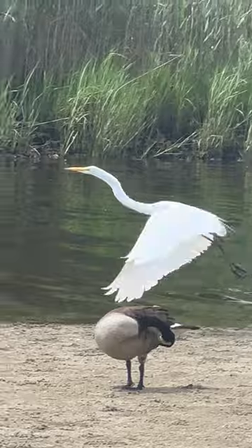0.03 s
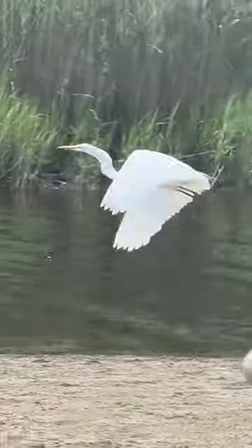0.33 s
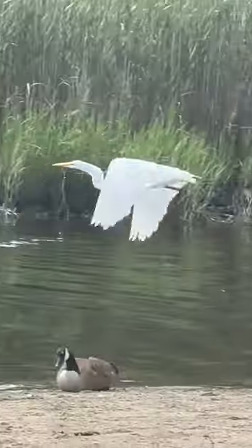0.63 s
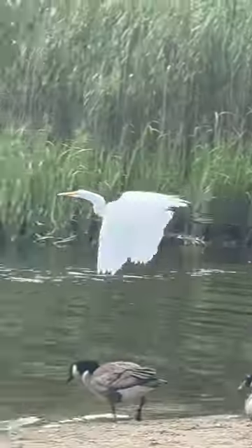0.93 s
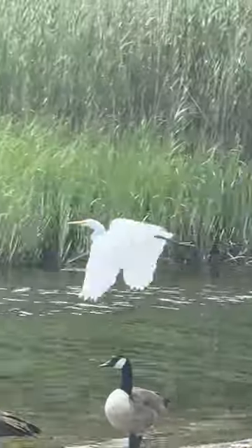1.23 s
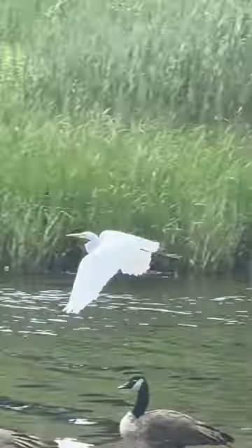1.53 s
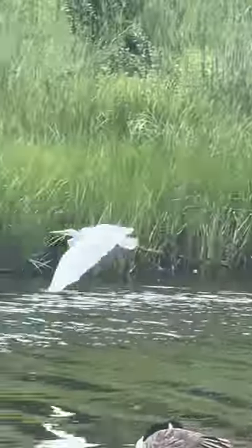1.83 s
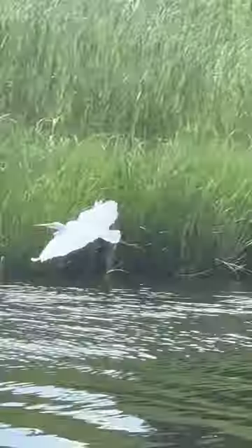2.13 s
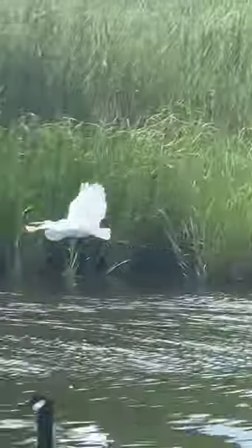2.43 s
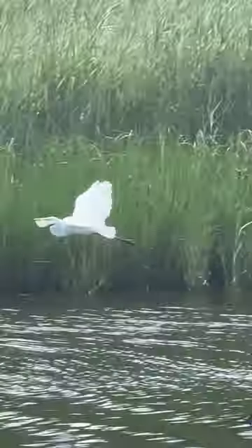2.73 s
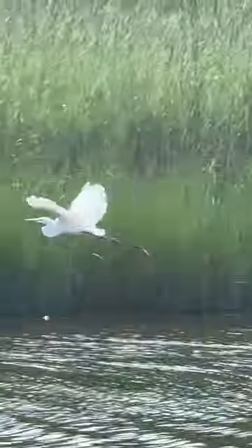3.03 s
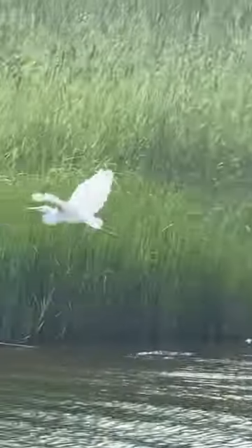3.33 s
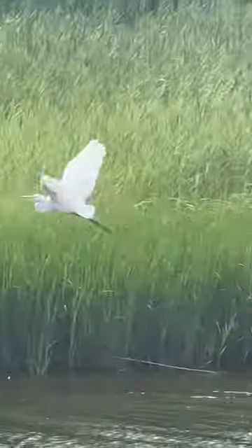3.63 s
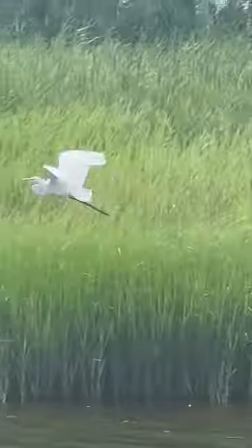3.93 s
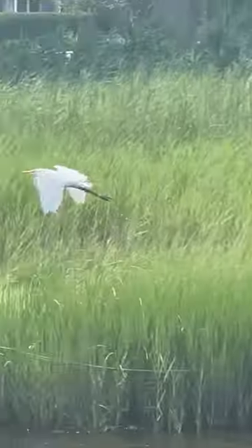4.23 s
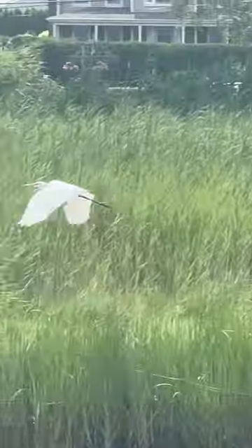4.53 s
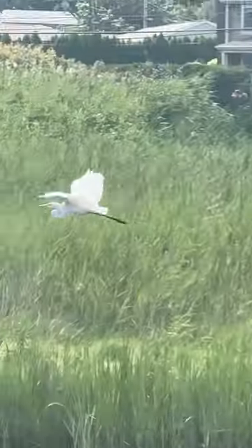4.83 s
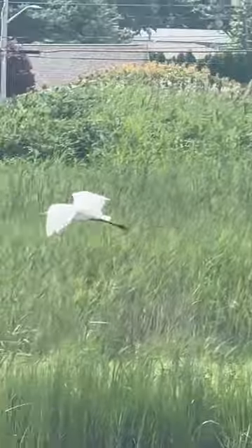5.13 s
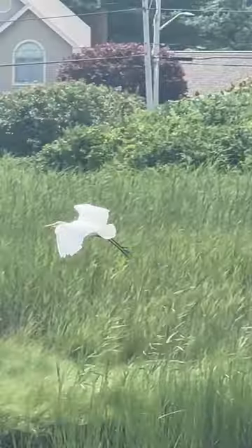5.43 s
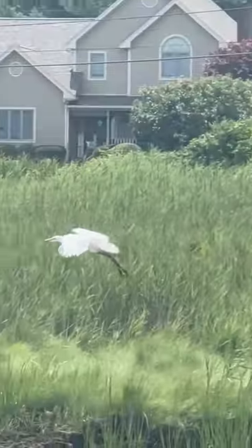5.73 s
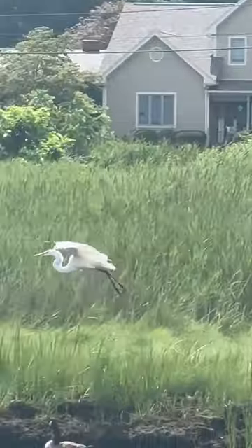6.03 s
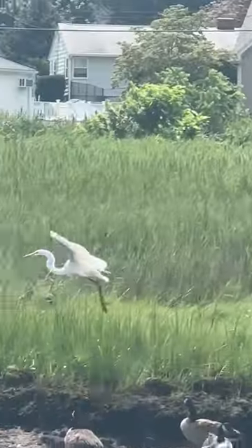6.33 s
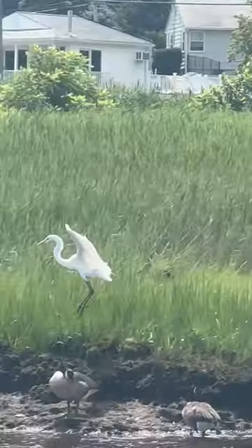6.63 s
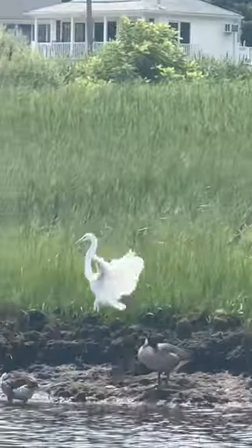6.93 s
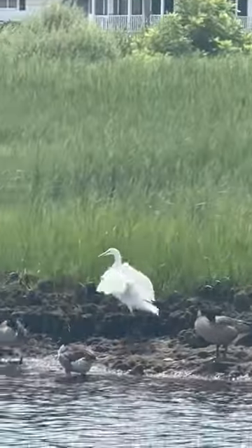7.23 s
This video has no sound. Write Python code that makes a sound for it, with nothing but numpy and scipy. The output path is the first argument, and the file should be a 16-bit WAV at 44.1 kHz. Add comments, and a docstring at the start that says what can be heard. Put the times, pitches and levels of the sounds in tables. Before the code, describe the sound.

Gusts of wind rumble and thump on the microphone outdoors, then ease to a breeze over faint distant traffic.

```python
"""Edge of a tidal marsh: gusts of wind buffet a hand-held microphone.
Large eddies rumble on its two ports, small ones flutter when the gust is strong, and single eddies
hit as thumps and pops. Behind the wind lie a far wash of traffic with a faint whine, thin hiss,
distant birds and a few ticks and bumps of the hand on the case."""
import sys
import numpy as np
from scipy import signal
from scipy.fft import rfft, irfft
from scipy.io import wavfile

SR = 44100
rng = np.random.default_rng(int(sys.argv[2]) if len(sys.argv) > 2 else 0)


def waveform_to_disk(signal):
    """Save audio, clipped to [-1, 1], as 16-bit WAV at the path in sys.argv[1]."""
    frames = np.transpose(np.atleast_2d(signal))
    scaled = np.clip(frames, -1, 1) * 32767
    samples = np.round(scaled).astype(np.int16)
    wavfile.write(sys.argv[1], SR, samples)


N = 325458
T = np.arange(N) / SR
HZ = np.fft.rfftfreq(N, 1 / SR) + 1e-3

# Breeze, two long gusts, one short: (time [s], large-eddy level [dB], middle-eddy level [dB])
WIND_LEVELS = [(0.0, -43.5, -49.5), (0.2, -39, -42), (0.28, -41.5, -51.5), (0.95, -42.5, -49),
               (1.22, -38.5, -40.5), (1.62, -33.5, -41.5), (2.0, -37.5, -44), (2.33, -39.5, -43.5),
               (2.45, -29.5, -28.5), (2.8, -27.5, -20.5), (3.05, -28.5, -22), (3.35, -26.5, -25),
               (3.85, -33.5, -35), (4.24, -30.5, -27), (4.31, -19.5, -20), (4.55, -17.5, -18),
               (4.98, -15.5, -20), (5.14, -20.5, -29.5), (5.54, -25.5, -29), (5.65, -40, -41.5),
               (5.84, -30.5, -35), (6.02, -28, -28), (6.12, -31, -40.5), (6.35, -44, -48.5),
               (7.38, -44.5, -52)]


def wind(low_hz=140, high_hz=450, churn_hz=50, puff_db=1.97, steady_db=-20):
    """Eddies of three sizes, churned by the same turbulence; lulls still the smallest most."""
    # Eddy spectrum: (frequency [Hz], relative level [dB])
    spectrum = [(20, -20), (40, 2.5), (70, 6.5), (160, 0.5), (250, -1), (385, -10), (597, -10),
                (1080, -26.5), (1400, -46), (1900, -79), (3000, -77.5), (6000, -125)]
    large_db, middle_db = curves(WIND_LEVELS)
    small_db = middle_db - 11.5 + 0.41 * (middle_db - large_db)
    fitful = np.clip((steady_db - middle_db) / 20, 0, 1)  # a breeze puffs, a full gust blows evenly
    puffs = noise(below(HZ, 12, order=4) * below(5.6, HZ, order=4))
    drop_db = lull_db() + puff_db * fitful * puffs
    colour = spectrum_gain(spectrum)
    under_low, under_high = below(HZ, low_hz, order=5), below(HZ, high_hz, order=5)
    churn = np.clip(noise(below(HZ, churn_hz, order=2)), -2.5, 2.5)

    def eddies(band, churn_db):
        return steadied(port_noise(colour * band) * gain_of(churn_db * churn), window_s=0.12)

    rumble = eddies(under_low, churn_db=1)
    body = eddies(np.sqrt(1 - under_low ** 2) * under_high, churn_db=3)
    flutter = eddies(np.sqrt(1 - under_high ** 2), churn_db=3.5)
    return (gain_of(large_db - 0.5 - 0.96 * drop_db) * rumble
            + gain_of(middle_db - 0.5 - drop_db) * body
            + gain_of(small_db - 1.5 * drop_db) * flutter)


def lull_db():
    """Drop in wind level as the flow briefly lets go of the ports."""
    # Lulls, negative for a surge: (time [s], half length [s], depth [dB])
    lulls = [(0.87, 0.081, 4.5), (1.404, 0.016, 2.5), (2.33, 0.015, -1), (2.395, 0.014, -2.5),
             (2.459, 0.011, 9), (2.52, 0.0064, 3), (2.593, 0.016, 6.5), (2.645, 0.05, 4),
             (2.863, 0.013, 6.5), (3.017, 0.0048, 1.5), (3.146, 0.0058, 5.5), (3.186, 0.0041, 8),
             (3.236, 0.035, 8.5), (3.282, 0.012, 1), (3.392, 0.0087, 12), (3.431, 0.01, 5.5),
             (3.481, 0.02, 11), (3.682, 0.022, 7.5), (3.887, 0.0062, 15), (4.049, 0.013, 9.5),
             (4.156, 0.026, 9.5), (4.392, 0.01, 4.5), (4.636, 0.022, 5.5), (4.745, 0.035, 8),
             (4.871, 0.044, 5.5), (4.96, 0.008, -2), (5.064, 0.029, 13.5), (5.203, 0.021, 11.5),
             (5.253, 0.015, 7), (5.311, 0.0099, 4), (5.454, 0.017, 1.5), (5.745, 0.03, 1.5),
             (5.947, 0.022, 6.5)]
    return sum(depth_db * swell(s, half_s) for s, half_s, depth_db in lulls)


def buffets(cycles=2.09, top_hz=1550, push_share=0.48, size=4096):
    """Single eddies: one push in a few cycles of churning; the smaller, the shorter and brighter."""
    # Strongest eddies on the ports: (time [s], level [dB], corner [Hz])
    hits = [(0.724, -27.5, 323), (1.161, -32, 330), (1.238, -24, 300), (1.291, -34, 328), (1.484, -26, 270),
            (1.611, -20.5, 168), (1.653, -28.5, 260), (1.781, -27, 129), (2.06, -26.5, 302),
            (2.202, -30.5, 290), (2.343, -23.5, 380), (2.36, -12, 530), (2.372, -18, 420), (2.42, -10, 450),
            (2.429, -17.5, 560), (2.475, -19, 720), (2.494, -9.5, 476), (2.527, -18, 450),
            (2.534, -14, 560), (2.553, -13.5, 430), (2.563, -13, 480), (2.572, -19.5, 700),
            (2.604, -22, 600), (2.626, -17.5, 450), (2.652, -16, 450), (2.719, -15, 380), (2.745, -11, 423),
            (2.786, -11, 480), (2.818, -12.5, 310), (2.83, -12, 370), (2.846, -10, 420), (2.881, -10, 394),
            (2.922, -9, 380), (2.964, -2, 324), (3.001, -7, 310), (3.024, -15, 616), (3.031, -7.5, 230),
            (3.104, -15, 380), (3.131, -14, 520), (3.159, -12.5, 580), (3.194, -12, 412), (3.204, -7, 241),
            (3.263, -16.5, 560), (3.276, -21, 620), (3.309, -4.5, 310), (3.324, -12, 397),
            (3.342, -12.5, 345), (3.375, -11.5, 490), (3.409, -20, 473), (3.431, -20, 460),
            (3.452, -13.5, 460), (3.474, -23, 700), (3.517, -10.5, 470), (3.566, -16, 506),
            (3.577, -17.5, 380), (3.588, -21.5, 694), (3.604, -18, 300), (3.65, -30, 370),
            (3.727, -13, 470), (3.771, -12.5, 383), (3.802, -22, 850), (3.861, -21, 940),
            (3.937, -16.5, 745), (3.964, -20, 870), (4.005, -7.5, 303), (4.014, -19.5, 795),
            (4.077, -15.5, 440), (4.091, -23, 796), (4.102, -12.5, 510), (4.108, -10, 240),
            (4.2, -18.5, 600), (4.302, -3, 237), (4.314, -12, 380), (4.324, -5.5, 220), (4.369, -19, 300),
            (4.409, -13, 520), (4.416, -8, 226), (4.429, -11.5, 600), (4.483, -9, 252), (4.519, -14, 330),
            (4.557, -3, 260), (4.562, -8, 545), (4.59, -7.5, 300), (4.65, -6, 278), (4.696, -20.5, 810),
            (4.708, -15, 228), (4.795, -16, 520), (4.804, -2, 229), (4.934, -3.5, 360), (4.982, -8.5, 330),
            (4.994, -16, 540), (5.011, -6.5, 230), (5.095, -15, 400), (5.117, -14.5, 165),
            (5.164, -10.5, 310), (5.214, -10.5, 300), (5.236, -15, 273), (5.283, -11.5, 363),
            (5.324, -13.5, 171), (5.367, -14.5, 490), (5.385, -15, 170), (5.415, -10, 307),
            (5.494, -11.5, 330), (5.527, -19, 330), (5.67, -22.5, 418), (5.7, -19.5, 300),
            (5.839, -19, 440), (5.864, -24, 560), (5.893, -21, 430), (6.007, -12.5, 404), (6.05, -25, 487),
            (6.079, -25, 620), (6.086, -20, 250), (6.941, -25, 306)]
    out = np.zeros((2, N))
    t, hz = event_axes(size)
    for s, db, corner_hz in hits:
        colour = below(hz, 1.046 * corner_hz, order=3.54) * below(0.27 * corner_hz, hz, order=2)
        colour *= below(hz, top_hz, order=6)
        churn = port_noise(colour, size) * np.exp(-(t * corner_hz / cycles) ** 2)
        churn /= abs(churn).max(1, keepdims=True)
        phase = 2 * np.pi * rng.random((2, 1))
        push = np.fft.fftshift(irfft(colour * np.exp(1j * phase)), axes=1)
        push /= abs(push).max()
        add(out, s, gain_of(db) * (push_share * push + (1 - push_share) * churn))
    return out


def pops(low_hz=300, top_hz=4200, size=4096):
    """A small eddy bursts right on the port: one spike of suction, equal in both channels."""
    # Bursts: (time [s], peak [dB], brightness [Hz])
    bursts = [(3.193, -12.5, 343), (3.226, -21, 520), (4.199, -18.5, 470), (4.277, -20, 500),
              (4.299, -21, 400), (4.351, -21, 400), (4.436, -17.5, 500), (4.456, -22, 450),
              (4.4876, -12.5, 1000), (4.514, -20, 430), (4.554, -17, 500), (4.612, -17.5, 580),
              (4.672, -24, 400), (4.712, -16, 460), (4.794, -15.5, 400)]
    out = np.zeros((2, N))
    _, hz = event_axes(size)
    for s, peak_db, bright_hz in bursts:
        colour = np.exp(-hz / bright_hz) * below(low_hz, hz, order=2) * below(hz, top_hz, order=8)
        spike = np.fft.fftshift(irfft(colour))
        add(out, s, -gain_of(peak_db) * spike / spike.max())
    return out


def spits(per_s=18, over_wind_db=-4, scatter_db=4.5, corner_hz=700, low_hz=220, top_hz=1500):
    """Tiny eddies pop at random, scaled by the wind that carries them."""
    _, middle_db = curves(WIND_LEVELS)
    scatter = np.clip(rng.standard_normal(N), -2, 2)
    peak_db = middle_db - lull_db() + over_wind_db + scatter_db * scatter
    impulses = (rng.random(N) < per_s / SR) * gain_of(peak_db) * rng.choice([-1, 1], (2, N))
    colour = below(HZ, corner_hz, order=3) * below(low_hz, HZ, order=2) * below(HZ, top_hz, order=6)
    return irfft(rfft(impulses) * colour, N) / irfft(colour, N).max()


def spread(mid_side, hollow, lull_widening=0.58, dip_octaves=0.36):
    """Mid/side to left/right: central bass, one wide band, wider in lulls; hollow thins its centre."""
    # Band where the ports differ: (time [s], base side/mid at 1 kHz [dB], low edge [Hz], high edge [Hz])
    wide_band = [(0, -3.5, 905, 1500), (1.0, 0.5, 830, 1370), (1.7, 4, 590, 1080), (2.28, 1.5, 480, 1120),
                 (2.4, 2, 302, 1030), (2.75, 2.5, 315, 940), (3.15, -0.5, 297, 840), (3.5, -4.5, 293, 830),
                 (3.8, 7.5, 243, 595), (4.3, 6, 153, 590), (4.78, 5.5, 177, 655), (4.9, 6, 210, 1260),
                 (5.15, 6.5, 241, 1060), (5.48, 11, 330, 1300), (5.65, 3.5, 580, 1370),
                 (5.85, -1.5, 710, 1590), (6.1, 0, 845, 1370), (7.38, -5, 844, 1420)]
    # Brief dips of the mid signal: (time [s], half length [s], depth [dB], centre [Hz])
    mid_dips = [(2.45, 0.6, 6, 825), (5.049, 0.042, 29, 695), (5.13, 0.02, 15, 780), (5.197, 0.02, 23, 880),
                (5.234, 0.028, 26, 694), (5.325, 0.021, 10, 950), (5.46, 0.046, 28, 820),
                (5.578, 0.042, 34, 1000), (5.63, 0.041, 34, 880), (5.663, 0.022, 11, 1270),
                (5.774, 0.082, 15, 1130), (5.93, 0.056, 11, 1150)]
    hz, t, (mid, side) = signal.stft(mid_side, SR, nperseg=1024, noverlap=768)
    hz = hz[:, None] + 1
    db, low_hz, high_hz, drop_db = (np.interp(t, T, c) for c in curves(wide_band) + [lull_db()])
    band = below(low_hz, hz, order=6) * below(hz, high_hz, order=11) * below(hz, 1900, order=10)
    side_gain = gain_of(db + lull_widening * drop_db) * (hz / 1000) ** 2.11 * band
    dip_db = sum(depth_db * np.exp(-((t - s) / half_s) ** 4 - (np.log2(hz / dip_hz) / dip_octaves) ** 2)
                 for s, half_s, depth_db, dip_hz in mid_dips)
    spectra = np.array([mid * gain_of(-dip_db), side * side_gain]) / (1 + side_gain ** 2) ** (hollow / 2)
    return left_right(*signal.istft(spectra, SR, nperseg=1024, noverlap=768)[1][:, :N])


def overload(x, ceiling=0.75, rasp_db=-33, low_hz=610, top_hz=1900):
    """Hard blows round off in the microphone; air rasps on the port at each pressure crest."""
    rounded = ceiling * np.tanh(x / ceiling)
    rasp = noise(below(low_hz, HZ, order=3) * below(HZ, top_hz, order=6))
    return rounded + gain_of(rasp_db) * rasp * rounded.mean(0) ** 2


def ticks(low_hz=1350, top_hz=9400, ring_hz=7700, dip_hz=5900, width_hz=800, size=4096):
    """Dry snaps and scuffs on the case, which adds one high ring above a dip."""
    # Handling contacts: (time [s], level [dB], half length [s], centre [Hz], snap share [0-1])
    contacts = [(0.2177, -31, 0.0007, 2700, 0.9), (0.2232, -21, 0.0012, 2750, 0.6),
                (0.231, -42, 0.015, 2200, 0), (0.345, -43, 0.014, 4430, 0.1),
                (1.867, -40, 0.0052, 2600, 0.17), (3.296, -45, 0.011, 3000, 0.05),
                (6.826, -46, 0.009, 1850, 0), (7.026, -49, 0.004, 4370, 0.2)]
    out = np.zeros((2, N))
    t, hz = event_axes(size)
    ring_db = 8 * np.exp(-((hz - ring_hz) / width_hz) ** 2)
    dip_db = 8 * np.exp(-((hz - dip_hz) / width_hz) ** 2)
    case = below(hz, top_hz, order=12) * below(low_hz, hz, order=3) * gain_of(ring_db - dip_db)
    for s, db, half_s, centre_hz, snap_share in contacts:
        colour = case * below(hz, 1.6 * centre_hz, order=2) * around(hz, centre_hz, half_octaves=1)
        scuff = noise(colour, size) * np.exp(-(t / half_s) ** 2)
        snap = np.fft.fftshift(irfft(colour))
        tick = snap_share * snap / snap.max() + (1 - snap_share) * scuff / abs(scuff).max()
        add(out, s, gain_of(db) * tick)
    return out


def bumps(case_hz=295, half_s=0.02, top_hz=700):
    """The hand bumps the case, which gives a dull, brief hum."""
    # Soft bumps: (time [s], level [dB])
    touches = [(6.281, -40), (6.385, -47), (6.478, -43.5), (6.67, -39.5), (6.78, -43), (6.848, -40.5)]
    hum = noise(below(HZ, top_hz, order=4) * around(HZ, case_hz, half_octaves=0.17))
    envelope = sum(gain_of(db) * swell(s, half_s) for s, db in touches)
    return envelope * steadied(hum[None], window_s=0.03)


def traffic(top_hz=1900):
    """Far, dull wash; its centre drifts and it narrows as a vehicle passes."""
    # Traffic band: (time [s], level [dB], centre [Hz], half width [octaves])
    track = [(0, -55.5, 910, 0.43), (.6, -55.5, 725, 0.83), (1.15, -57.5, 840, 1), (1.8, -57.5, 794, 1),
             (2.03, -52, 1130, 0.56), (2.2, -51.5, 1180, 0.53), (2.36, -56.5, 1190, 0.7),
             (2.6, -54.5, 1105, 0.43), (4.9, -56, 1070, 0.97), (5.6, -54.5, 1260, 0.46),
             (5.9, -52.5, 1250, 0.69), (6.2, -52, 980, 0.95), (6.8, -51, 804, 1), (7.38, -53, 945, 1)]
    db, centre_hz, half_octaves = curves(track)
    far = port_noise(below(HZ, top_hz, order=6) * below(HZ, 1000, order=1))
    hz, t, spectra = signal.stft(far, SR, nperseg=1024)
    band = around(hz[:, None] + 1, np.interp(t, T, centre_hz), np.interp(t, T, half_octaves))
    wash = signal.istft(spectra * band, SR, nperseg=1024)[1][:, :N]
    return gain_of(db) * steadied(wash, window_s=0.28)


def whine(pitch_waver=0.0057, waver_hz=24.8, flicker_db=3.0):
    """Far, unsteady notes that swell and fade in the traffic."""
    # Swells: (time [s], half length [s], pitch [Hz], level [dB])
    swells = [(0.98, 0.22, 597, -61), (6.75, 0.27, 587, -57), (7.1, 0.27, 586, -57)]
    slow = below(HZ, waver_hz, order=2)
    clock_s = np.cumsum(1 + pitch_waver * noise(slow)) / SR
    notes = sum(gain_of(db) * swell(s, half_s) * np.sin(2 * np.pi * hz * clock_s)
                for s, half_s, hz, db in swells)
    return np.sqrt(2) * gain_of(flicker_db * noise(slow)) * notes


def hiss(mid_db=-61.5):
    """Even, thin hiss of the open air and the microphone."""
    # Hiss spectrum: (frequency [Hz], relative level [dB])
    spectrum = [(1100, -109), (1500, -99), (2000, -97.5), (3000, -99), (4500, -102), (6000, -101),
                (7700, -101), (9500, -106), (11000, -112), (12000, -132), (15500, -117)]
    # Stereo width: (frequency [Hz], side/mid [dB])
    width = [(2000, -24.5), (4200, -37), (5000, 4), (6000, -42), (7700, -4), (9500, 0.5), (11000, 9.5),
             (12000, 25), (15500, 8.5)]
    mid, side = port_noise(spectrum_gain(spectrum))
    side = irfft(rfft(side) * spectrum_gain(width), N)
    return gain_of(mid_db) * left_right(mid, side)


def birds(gain_db=-3, size=32768):
    """Short gliding calls, blurred by distance into narrow bands of noise."""
    # Calls: (time [s], half length [s], pitch [Hz], glide [Hz/s], width [Hz], relative level [dB])
    calls = [(2.01, .025, 6100, 0, 400, -65), (2.335, .014, 6000, 0, 500, -65),
             (2.52, .025, 4100, 3004, 500, -61), (3.43, .014, 7400, -3, 450, -63),
             (4.56, .065, 7750, 300, 70.5, -67), (4.85, .1, 7480, -900, 90, -71),
             (5.2, 0.061, 3830, -900, 91, -72), (5.23, .035, 7470, -1800, 90, -70),
             (5.47, 0.06, 7480, 899, 110, -66), (5.59, .06, 7410, -800, 90, -71)]
    out = np.zeros((2, N))
    t, hz = event_axes(size)
    for s, half_s, pitch_hz, glide_hz_per_s, width_hz, db in calls:
        phase = 2 * np.pi * (pitch_hz * t + glide_hz_per_s * t ** 2 / 2)
        in_phase, quadrature = port_noise(below(hz, width_hz / 2, order=2), size)
        whistle = in_phase * np.cos(phase) + quadrature * np.sin(phase)
        add(out, s, gain_of(db + gain_db) * whistle * np.exp(-(t / half_s) ** 2))
    return out


def gain_of(db):
    """Decibels to amplitude."""
    return 10 ** (np.asarray(db) / 20)


def spectrum_gain(points):
    """(Hz, dB) points as gains over HZ, interpolated in log frequency."""
    hz, db = np.transpose(points)
    return gain_of(np.interp(np.log(HZ), np.log(hz), db))


def curves(rows):
    """Each column after the time column as a curve over T."""
    s, *columns = np.transpose(rows)
    return [np.interp(T, s, column) for column in columns]


def swell(s, half_s):
    """Gaussian rise and fall around time s."""
    return np.exp(-((T - s) / half_s) ** 2)


def below(hz, corner_hz, order):
    """Low-pass gain; high-pass with the two frequencies swapped."""
    return 1 / np.sqrt(1 + (hz / corner_hz) ** (2 * order))


def around(hz, centre_hz, half_octaves):
    """Band-pass gain, symmetric in octaves."""
    return 1 / (1 + (np.log2(hz / centre_hz) / half_octaves) ** 2)


def noise(colour, size=N):
    """Unit-rms noise with the given spectrum."""
    x = irfft(rfft(rng.standard_normal(size)) * colour, size)
    return x / np.sqrt(np.mean(x ** 2) + 1e-20)


def port_noise(colour, size=N):
    """Two unrelated noises; at the ports, mid (shared) and side (opposed)."""
    return np.array([noise(colour, size), noise(colour, size)])


def steadied(x, window_s):
    """Levels each noise to unit rms: slow swells go, fast flutter stays."""
    window = signal.windows.hann(int(window_s * SR) + 3)
    power = signal.fftconvolve(x ** 2, window[None] / window.sum(), "same", axes=1)
    return x / np.sqrt(np.maximum(power, 1e-4))


def left_right(mid, side):
    """Signals of the two ports."""
    return np.array([mid + side, mid - side])


def event_axes(size):
    """Centred time [s] and frequency [Hz] axes of a short event."""
    return (np.arange(size) - size / 2) / SR, np.fft.rfftfreq(size, 1 / SR) + 1e-3


def add(mix, s, sound):
    """Mixes a sound in, centred on time s; mono goes to both channels."""
    size = sound.shape[-1]
    start = max(round(s * SR) - size // 2, 0)
    part = mix[:, start:start + size]
    part += sound[..., :part.shape[1]]


def scene():
    """Wind on the ports over the quiet marsh."""
    eddies = spread(wind() + buffets() + spits(), hollow=0.58)
    gusts = overload(eddies + pops())
    road = whine() + spread(traffic(), hollow=0.68)
    return gusts + road + hiss() + ticks() + bumps() + birds()


def record(dry, notch_hz=4980, notch_width_hz=110, notch_depth=0.85, low_cut_hz=42, top_hz=16000):
    """Microphone: bass cut, one narrow notch, treble limit; opens after 35 ms of silence."""
    notch = 1 - notch_depth * np.exp(-((HZ - notch_hz) / notch_width_hz) ** 2)
    coloured = irfft(rfft(dry) * notch * below(low_cut_hz, HZ, order=3), N)
    fade_in = np.clip((T - 0.035) / 0.004, 0, 1)
    low_pass = signal.firwin(511, top_hz, window=("kaiser", 9), fs=SR)
    return signal.oaconvolve(coloured * fade_in, low_pass[None], "same")


dry = scene()
out = record(dry)
waveform_to_disk(out)
```